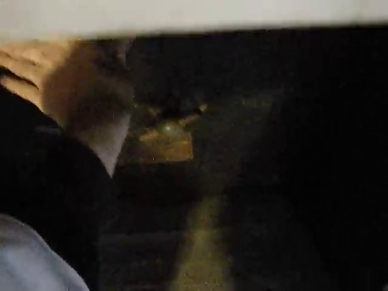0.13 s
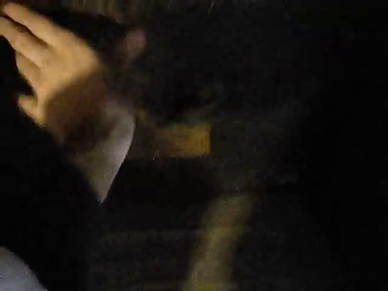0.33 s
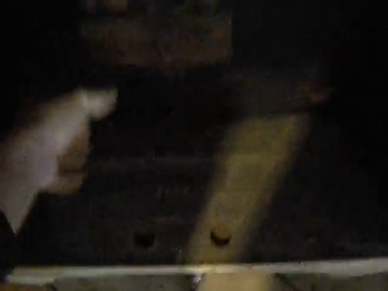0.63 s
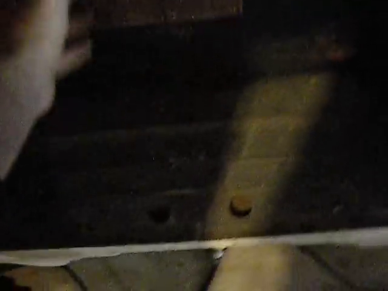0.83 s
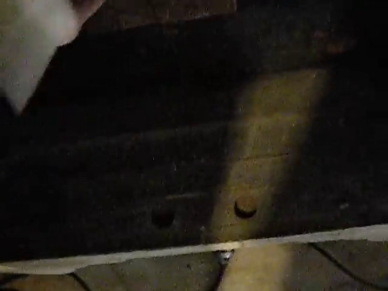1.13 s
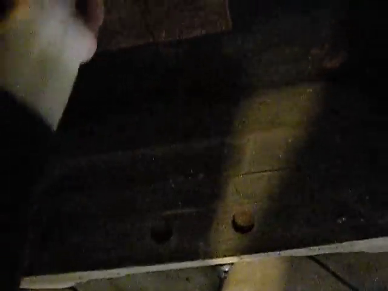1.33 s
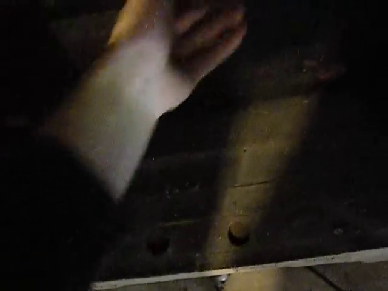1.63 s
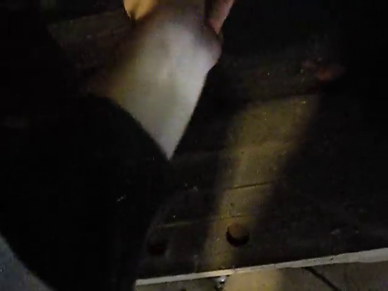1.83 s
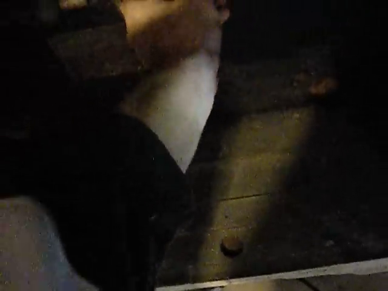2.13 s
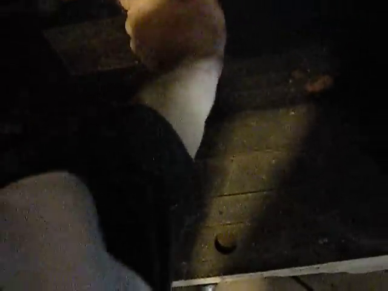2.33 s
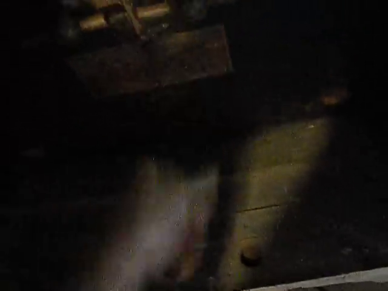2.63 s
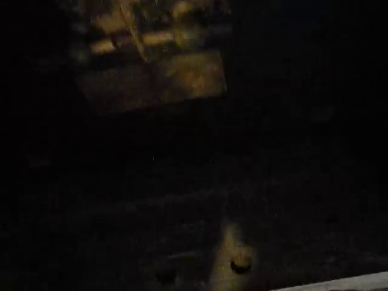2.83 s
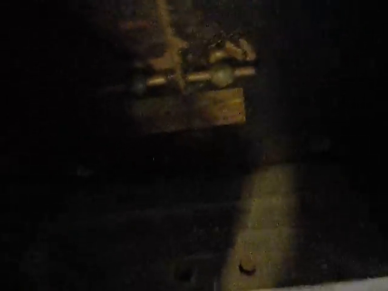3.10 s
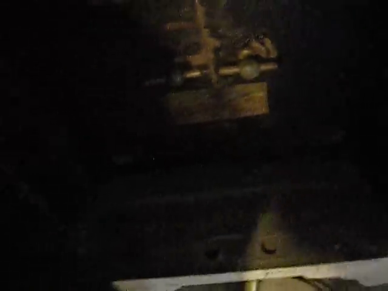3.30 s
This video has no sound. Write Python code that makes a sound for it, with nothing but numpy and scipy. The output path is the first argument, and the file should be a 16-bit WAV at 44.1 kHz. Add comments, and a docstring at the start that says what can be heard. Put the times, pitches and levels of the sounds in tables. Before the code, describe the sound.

Heavy bolts of a steel safe door clack in three quick clusters, then a brief high squeak; a low machine hum continues in a small room, recorded close on a muffled handheld microphone.

```python
"""Bolts of a steel safe door

A hand works the heavy bolts of a safe door. Each blow is a short rattle of noise through the ringing
tones of the bolts, plus a push that thumps the door plate, with a small room's echo. Steel squeaks once:
a rough high tone. Behind it a machine drones with unsteady sines and rushing noise, and a hand-held
camera adds deep, lumpy noise. The recorder dulls the treble and clips loud peaks.
"""
import sys
import numpy as np
from scipy import signal
from scipy.fft import rfft, irfft, next_fast_len
from scipy.io import wavfile
from scipy.ndimage import map_coordinates

SR = 44100
rng = np.random.default_rng(int(sys.argv[2]) if len(sys.argv) > 2 else 0)


def natural_amplitude(level_db):
    """Convert a level in decibels to a linear amplitude factor, elementwise."""
    exponent = np.asarray(level_db, float) / 20
    return 10 ** exponent


def unload_audio(sound):
    """Save the sound as a 16-bit wav file, at the path given as the first command line argument."""
    columns = np.transpose(np.atleast_2d(sound))
    # keep every value between -1 and 1, then stretch to whole-number steps
    steps = np.round(np.clip(columns, -1, 1) * 32767)
    wavfile.write(sys.argv[1], SR, steps.astype(np.int16))


N = 152586  # length in samples

# Contacts of bolt and door: start_s, bolt_db, door_db, chatter_s, bolt_tilt_db_per_octave,
# door_tilt_db_per_octave
BLOWS = [(0.091, -20, -12.5, 0.011, -4, -2), (0.111, -17, -12.5, 0.018, -2, -9),
         (0.123, -17, -10, .006, -8, -2), (0.144, -24, -25, 0.023, -5.8, -11.5),
         (0.162, -30, -31.5, 0.032, 3.5, 2.5), (0.195, -35.5, -33, 0.026, 2, -3),
         (0.221, -37.5, -41, 0.0065, 0, 22), (0.244, -34.5, -42, .008, 8, 1.5),
         (1.290, -16.5, -23, 0.011, -4, 2), (1.304, -19.5, -20.5, 0.0077, 0, -1.5),
         (1.347, -25, -38.5, 0.0083, 0, -8), (1.365, -9, -21.5, 0.0028, 0.5, -7.5),
         (1.373, -12.5, -29, 0.002, 2.5, -14), (1.39, -21.5, -25.5, 0.0044, 0, -7.5),
         (1.3928, -15.5, -20, 0.0011, 0, -3), (1.397, -28, -41, 0.006, 8, 1.5),
         (1.437, -39.5, -37.5, .01, 2.5, 0.5), (1.501, -43, -21.5, 0.0039, -2.2, -24.5),
         (1.519, -33, -36.5, 0.004, 0.5, -2), (1.609, -39.5, -41, 0.0035, 0, -3.5),
         (1.902, -25.5, -42, 0.0098, 1, 6), (1.927, -20.5, -15.5, 0.012, -4.5, 0.5),
         (1.942, -22.5, -22.5, 0.01, -0.5, -4.5), (1.977, -12, -15.5, 0.0058, 0, 2),
         (1.998, -16, -16.5, .008, 0, 6.5), (2.013, -29.5, -37, 0.0047, -0.5, -17),
         (2.128, -32, -40.5, 0.0033, -5, -0.5), (2.1341, -6, -20.5, 0.006, -1, 2.5),
         (2.142, -15.5, -22, .004, 2, 5), (2.161, -28.5, -22.5, 0.0075, 0, -2),
         (2.189, -30, -39, .012, -7, -10.5), (2.355, -28, -36.5, .008, -8.5, -0.5),
         (2.367, -16.5, -22.5, 0.0044, -5, 3.5), (2.649, -35.5, -44.5, .015, 2.5, -3)]
# Ringing tones of the bolt work: pitch_hz, width_hz, level_db
BOLT_MODES = [(914, 170, -4), (1190, 98, -4), (1426, 120, -7), (1704, 140, -2), (2084, 470, -4.5),
              (2670, 200, -3.5), (2820, 150, -4.5), (3250, 400, -5.5), (3555, 200, -5.5), (3885, 310, -8)]
# Ringing tones of the door plate: pitch_hz, width_hz, level_db
DOOR_MODES = [(179.2, 23, 0), (240, 35, -1.5), (336.6, 30, 1.5), (466.5, 44, -4.5), (518.5, 76, -8),
              (694, 50, -7.5)]
# How fast the room's echo dies: pitch_hz, time_to_fall_60_db_s
ROOM_DECAY = [(200, 0.1), (1000, 0.17), (2500, 0.35), (4000, 0.28)]
# Loudness of the squeak: time_s, level_db
SQUEAK_LEVEL = [(2.634, -58), (2.64, -32), (2.647, -19.5), (2.654, -21), (2.657, -35.5), (2.666, -26.5),
                (2.675, -43), (2.695, -40.5), (2.708, -40), (2.714, -57), (2.735, -46.5), (2.745, -62)]
# Loudness of the machine's two low tones: time_s, lower_tone_db, upper_tone_db
LOW_TONES = [(0.0, -35.5, -58), (0.08, -59, -17), (0.35, -23.5, -47.5), (0.66, -24, -23),
             (1.27, -21, -28.5), (1.35, -15, -14.5), (1.47, -34.5, -43), (1.57, -17, -23.5),
             (1.73, -25.5, -30.5), (1.83, -15.5, -46), (1.86, -17, -40), (1.97, -34, -43.5),
             (2.1, -15.5, -28), (2.21, -59.5, -32), (2.26, -22.5, -33), (2.62, -21, -22), (3.3, -23.5, -30),
             (3.46, -46.5, -32)]
# Tones at multiples of the shaft's speed: multiple, level_db
SHAFT_TONES = [(3, -39.5), (4, -31), (5, -43), (6, -35), (8, -44.5), (9, -44), (10, -52), (12, -48)]
# Change added to the sixth multiple: time_s, change_db
SIXTH_CHANGE = [(0, 9), (.5, 2), (.9, -7.5), (1.5, -4.5), (3.46, -10)]
# Colour of the rushing air, relative: pitch_hz, level_db_per_hz
AIR_COLOUR = [(47, -17), (80, -17), (135, -2.5), (191, -13), (252, -7.5), (333, -17), (562, -20.5),
              (834, -24), (1080, -24.5), (4020, -42), (5230, -96.5), (8840, -120)]
# Change added to the air's loudness: time_s, change_db
AIR_CHANGE = [(0, 1.5), (.4, -3), (.9, -1.5), (1.5, -2), (1.9, -4.5), (2.3, -4.5), (2.8, -4), (3.46, -0.5)]
# Loudness of the handling rumble: time_s, level_db
RUMBLE_LEVEL = [(0.0, -15), (0.03, -32.5), (0.09, -23.5), (0.18, -26.5), (0.41, -37), (1.91, -38),
                (1.96, -22.5), (2.03, -39), (2.19, -20), (2.21, -37), (2.39, -23), (2.5, -39),
                (2.96, -35.5), (3.06, -18.5), (3.16, -31.5), (3.3, -20), (3.31, -28), (3.46, -30)]
# Colour of the handling rumble, relative: pitch_hz, level_db
RUMBLE_COLOUR = [(8, -29), (20, -20.5), (35, 1.5), (55, -10.5), (85, -6.5), (120, -54)]

CHATTER_DB, CHATTER_PER_S = 3, 900  # spread of the rattle's strength, and its random values a second
SWELL_DB = 1  # gain over the length of the chatter
BOLT_T60_S = 0.056  # time for the bolt to fall 60 dB after the chatter
PUSH_SHARE = 0.5  # decay time of the push as a share of the chatter length
ROOM_DB = -15.5  # echo against direct sound
SQUEAK_HZ, SIDE_HZ, SIDE_DB = 2955, 450, -20.5  # squeak pitch; distance and level of its side tones
LOWER_HZ, UPPER_HZ, SHAFT_HZ = 119.3, 139.15, 62.7
AIR_DB, AIR_WAVER_DB = -24, 0.7
INPUT_CLIP, OUTPUT_CLIP = 0.92, 0.72  # largest sizes let through before and after the treble cut
EDGE_HZ, EDGE_DB_PER_KHZ = 3640, 15  # start and slope of the gentle treble cut
TOP_HZ, TOP_DB_PER_KHZ = 4353, 94  # start and slope of the steep cut added to it


def unit(x):
    """Scales a sound to rms 1."""
    return x / np.sqrt(np.mean(x ** 2) + 1e-20)


def along(points, hz):
    """Reads values between (Hz, value) points on a log pitch axis."""
    f, values = np.transpose(points)
    return np.interp(np.log(hz + 1), np.log(f + 1), values)


def curves(rows):
    """Turns each column after the time into one value per sample."""
    times, *columns = np.transpose(rows)
    return [np.interp(np.arange(N) / SR, times, column) for column in columns]


def wobble(rate):
    """Draws a smooth random curve with rate random points a second."""
    return map_coordinates(rng.standard_normal(400), [np.arange(N) * rate / SR % 390])


def filtered(x, response):
    """Colours a sound by multiplying its spectrum by a response."""
    m = next_fast_len(len(x) + 8192)  # spare room for the ringing
    spectrum = rfft(x, m) * response(np.fft.rfftfreq(m, 1 / SR))
    return irfft(spectrum, m)[:len(x)]


def resonances(modes, f):
    """Adds up damped resonances with alternating signs; wider ones die sooner."""
    total = 0
    for k, (centre, width, db) in enumerate(modes):
        peak = 1j * f * width / (centre * centre - f * f + 1j * f * width)
        total = total + (-1) ** k * natural_amplitude(db) * peak
    return total


def tone(hz, db, waver_db, rate, drift):
    """Makes a sine whose level wavers about an rms of db and whose pitch drifts by a small fraction."""
    turns = np.cumsum(hz * (1 + drift * wobble(rate))) / SR
    phase = 2 * np.pi * (turns + rng.random())
    return np.sqrt(2) * natural_amplitude(db + waver_db * wobble(rate)) * np.sin(phase)


def shaken_bolt(tilt_db, drive, envelope):
    """Rings the bolt work with noise, then shapes it; its energy is set to that of the envelope."""
    def response(f):
        return resonances(BOLT_MODES, f) * natural_amplitude(tilt_db * np.log2((f + 250) / 2000))
    x = envelope * filtered(drive, response)
    return x * np.linalg.norm(envelope) / np.linalg.norm(x)


def door_thump(tilt_db, push):
    """Rings the door plate with a short uneven push; the first 20 ms have rms 1."""
    def response(f):
        return resonances(DOOR_MODES, f) * natural_amplitude(tilt_db * np.log2((f + 40) / 330))
    x = filtered(push, response)
    return x / np.sqrt(np.mean(x[:SR // 50] ** 2))


def room(x):
    """Adds an echo tail of fresh noise in which every pitch dies at its own speed."""
    hz, t, z = signal.stft(rng.standard_normal(SR // 2), SR, nperseg=256)
    fade = natural_amplitude(-60 * t / along(ROOM_DECAY, hz)[:, None])
    tail = signal.istft(z * fade, SR, nperseg=256)[1]
    tail = tail / np.linalg.norm(tail)
    delayed = np.pad(tail, (220, 0))  # the echo starts 5 ms late
    return x + natural_amplitude(ROOM_DB) * signal.fftconvolve(x, delayed)[:len(x)]


def bolts():
    """Each blow is a short rattle of contacts that rings the bolt work and thumps the door plate."""
    out = np.zeros(N + SR)
    t = np.arange(SR // 2) / SR
    for start, bolt_db, door_db, length, bolt_tilt_db, door_tilt_db in BLOWS:
        knots = rng.standard_normal(1000)
        rattle = natural_amplitude(CHATTER_DB * np.interp(t * CHATTER_PER_S, np.arange(len(knots)), knots))
        drive = rattle * rng.standard_normal(len(t))
        rise = 1 - np.exp(-t / 0.0004)
        swell_db = SWELL_DB * np.minimum(t / length, 1)
        after = np.maximum(t - length, 0)  # seconds since the chatter ended
        envelope = rise * natural_amplitude(swell_db - 60 * after / BOLT_T60_S)
        bolt = shaken_bolt(bolt_tilt_db, drive, envelope)
        push = np.exp(-t / (PUSH_SHARE * length)) * rng.standard_normal(len(t))
        door = door_thump(door_tilt_db, push)
        blow = room(natural_amplitude(bolt_db) * bolt + natural_amplitude(door_db) * door)
        out[round(start * SR):][:len(t)] += blow
    return out[:N]


def squeak():
    """Steel rubs on steel: a rough tone near 3 kHz with a weak tone on either side."""
    before = (SQUEAK_LEVEL[0][0] - 0.002, -120)
    after = (SQUEAK_LEVEL[-1][0] + 0.005, -120)
    db, = curves([before, *SQUEAK_LEVEL, after])
    main = tone(SQUEAK_HZ, db, 2.4, 120, drift=0.0054)
    below = tone(SQUEAK_HZ - SIDE_HZ, db + SIDE_DB, 4.1, 110, drift=0.02)
    above = tone(SQUEAK_HZ + SIDE_HZ, db + SIDE_DB, 4.1, 110, drift=0.02)
    return main + below + above


def machine():
    """Two unsteady low tones, tones at multiples of a shaft's speed, and noise for rushing air."""
    lower_db, upper_db = curves(LOW_TONES)
    lows = tone(LOWER_HZ, lower_db, 1.5, 18, drift=0.016) + tone(UPPER_HZ, upper_db, 0, 11, drift=0.019)
    sixth_db, = curves(SIXTH_CHANGE)
    shaft = np.zeros(N)
    for k, db in SHAFT_TONES:
        shaft += tone(k * SHAFT_HZ, db + (k == 6) * sixth_db, 3.67, 7, drift=0.004)
    air = unit(filtered(rng.standard_normal(N), lambda f: natural_amplitude(along(AIR_COLOUR, f))))
    change_db, = curves(AIR_CHANGE)
    air_db = AIR_DB + change_db + AIR_WAVER_DB * wobble(5.5)
    return lows + shaft + natural_amplitude(air_db) * air


def handling():
    """The camera shifts in the hand: deep noise whose strength comes in lumps."""
    deep = filtered(rng.standard_normal(N), lambda f: natural_amplitude(along(RUMBLE_COLOUR, f)))
    lumps = natural_amplitude(0.93 * wobble(3.9)) * deep
    level_db, = curves(RUMBLE_LEVEL)
    return natural_amplitude(level_db) * unit(lumps)


def scene():
    """Adds all sources into one channel."""
    return (bolts() + squeak() + machine() + handling())[None]


def top_cut(x):
    """Nothing passes above the cut-off."""
    return signal.sosfilt(signal.butter(12, 15850, fs=SR, output="sos"), x)


def record(dry):
    """The recorder clips its input, cuts the treble in two slopes, then clips again."""
    def treble_cut(f):
        gentle_db = EDGE_DB_PER_KHZ * np.maximum(f - EDGE_HZ, 0) / 1000
        steep_db = TOP_DB_PER_KHZ * np.maximum(f - TOP_HZ, 0) / 1000
        return natural_amplitude(-gentle_db - steep_db)
    overloaded = np.clip(dry[0], -INPUT_CLIP, INPUT_CLIP)
    dulled = filtered(overloaded, treble_cut)
    mix = np.clip(dulled, -OUTPUT_CLIP, OUTPUT_CLIP)[None]
    return top_cut(mix)


dry = scene()
out = record(dry)
unload_audio(out)
```